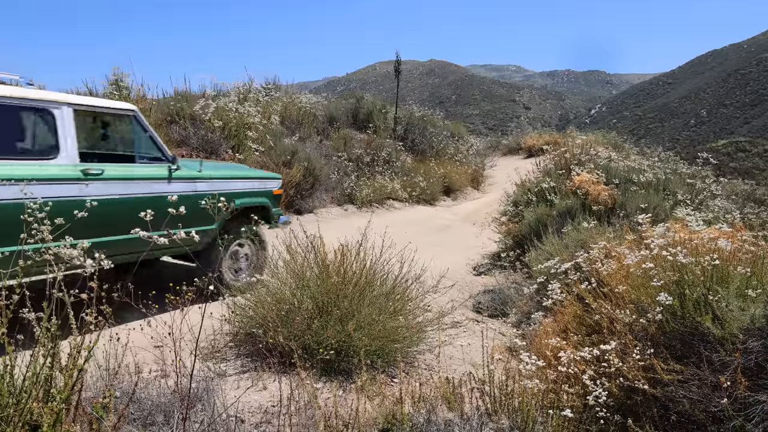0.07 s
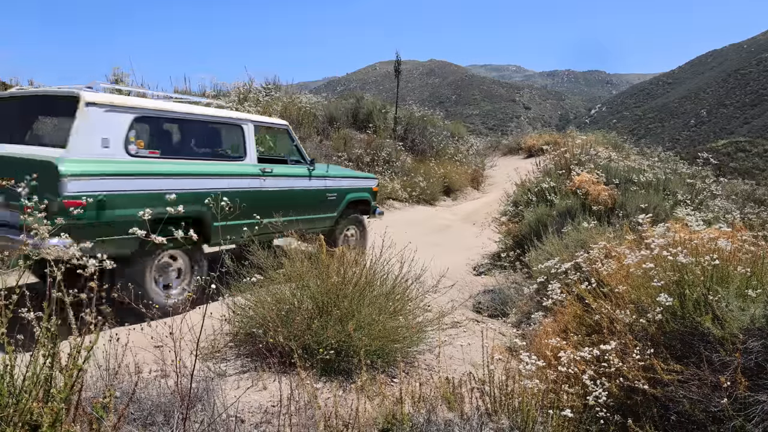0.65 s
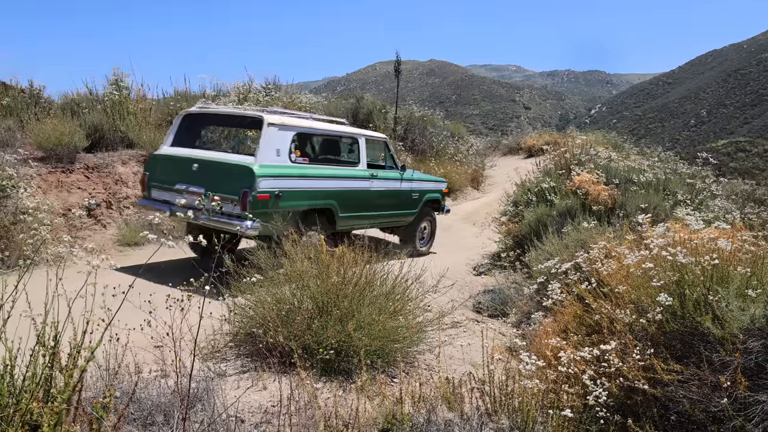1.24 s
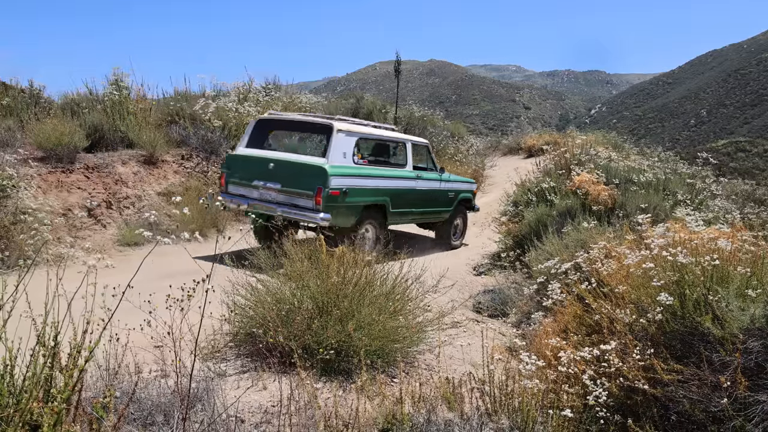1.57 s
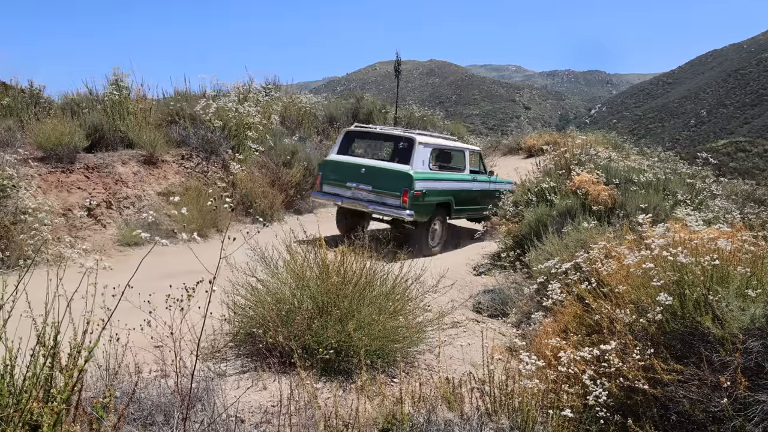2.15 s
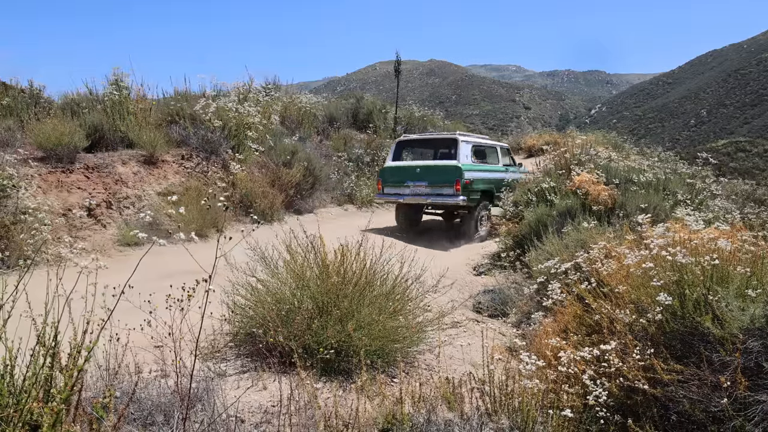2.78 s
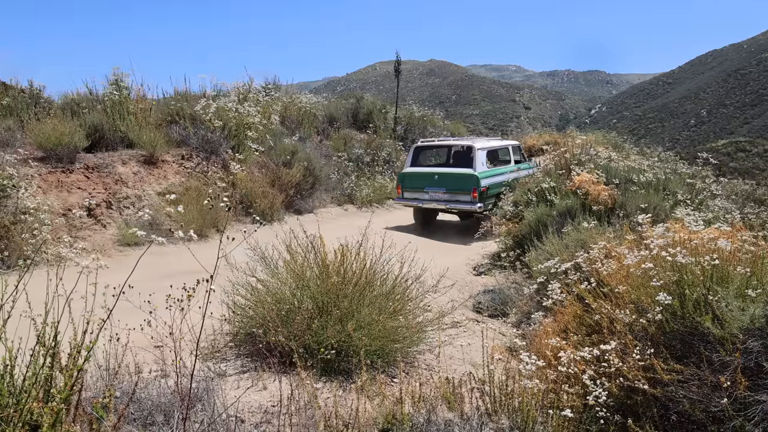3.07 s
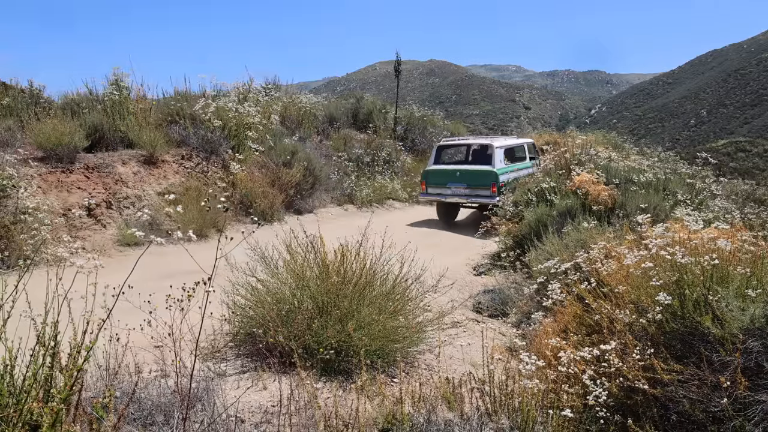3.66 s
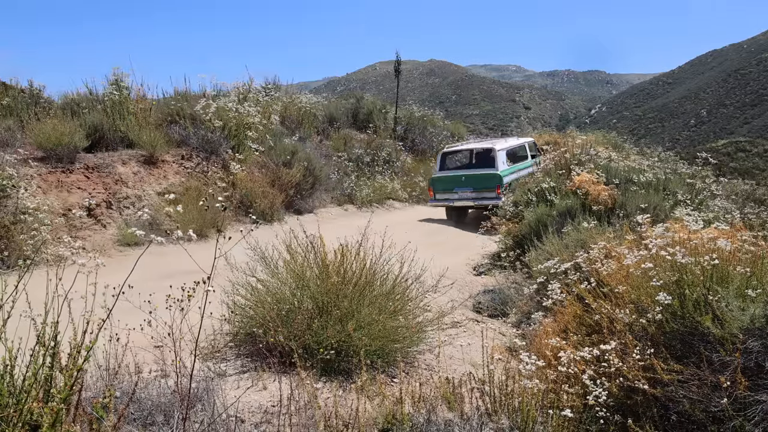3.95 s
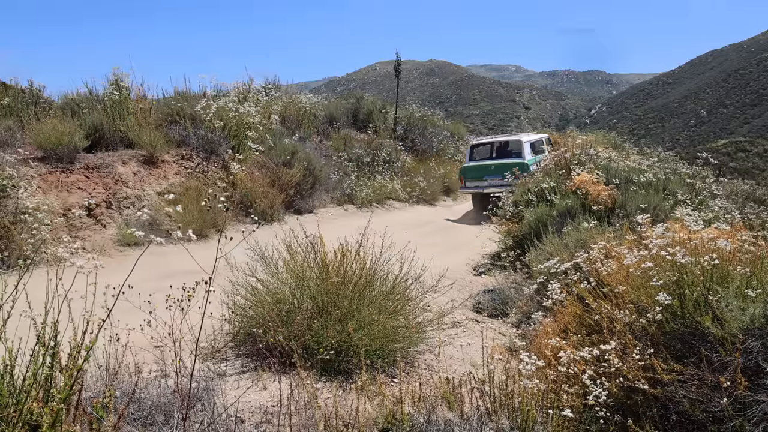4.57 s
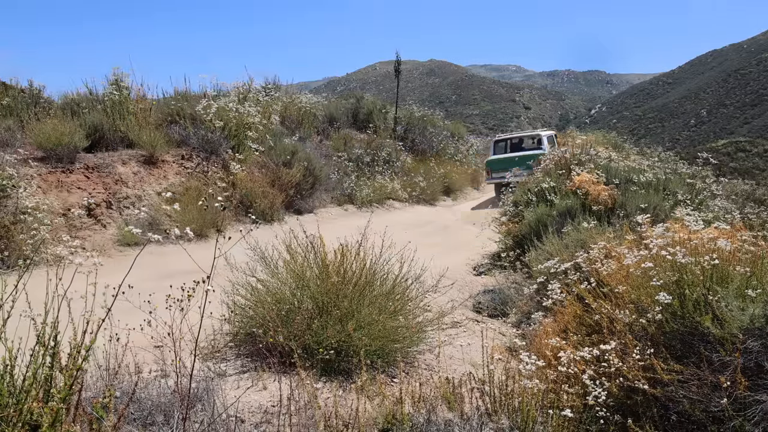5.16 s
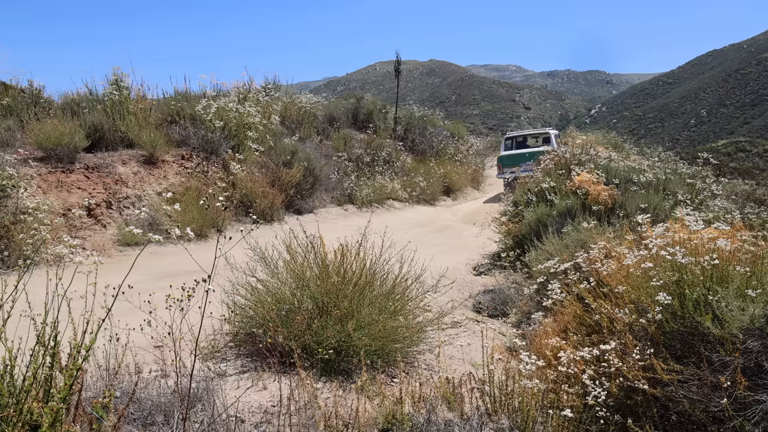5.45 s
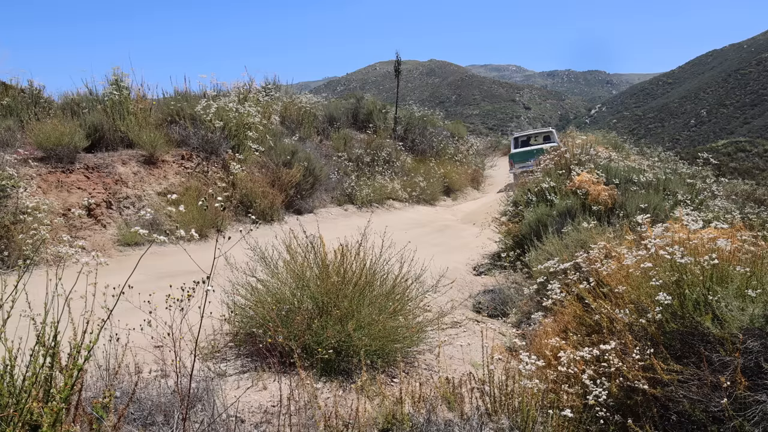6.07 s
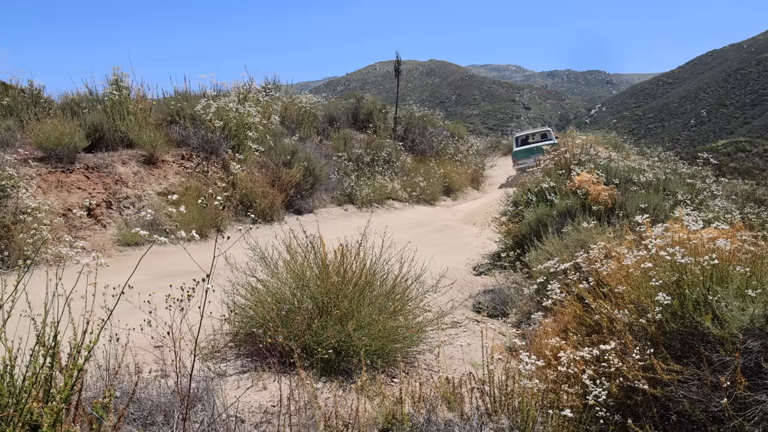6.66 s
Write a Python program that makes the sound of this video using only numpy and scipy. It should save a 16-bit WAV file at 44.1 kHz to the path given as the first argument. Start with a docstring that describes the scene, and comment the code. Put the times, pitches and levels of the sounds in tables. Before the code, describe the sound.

A big old engine rumbles by over crunching grit, dips with a clunk, coughs and accelerates into the distance.

```python
"""Old V8 on a sandy trail

A four-wheel drive crawls past, comes off the throttle, coughs, and pulls away uphill. Eight uneven
cylinders excite two resonant exhaust pipes, which makes the burble; turbulent gas rasps and crackles.
Fan, intake and tyres rush underneath, grit crunches, trim rattles, stones chink, a joint squeaks and
the chassis clunks. Throttle, engine speed, load and distance set the level of the burble and the rush."""
import sys
import numpy as np
from scipy import signal
from scipy.fft import rfft, irfft, next_fast_len
from scipy.io import wavfile
from scipy.ndimage import uniform_filter1d, map_coordinates

SR = 44100
rng = np.random.default_rng(int(sys.argv[2]) if len(sys.argv) > 2 else 0)


def dump_mix(stems):
    """Bounce the given channels to the path in sys.argv[1] as a 16-bit WAV at rate SR."""
    frames = np.atleast_2d(stems).T  # one column per channel
    limited = np.clip(frames, -1, 1)  # hard clip at full scale
    pcm = np.round(limited * 32767).astype(np.int16)
    wavfile.write(sys.argv[1], SR, pcm)


N = 300938

# engine speed through crawl, lull, uphill pull and easing off: time_s, firings_per_s
FIRING_RATE = [(0.0, 52.95), (0.25, 50.22), (0.54, 47.46), (0.8, 50.66), (0.97, 52.27), (1.16, 47.08),
               (1.4, 46.83), (1.61, 46.21), (1.86, 52.87), (2.1, 49.81), (2.34, 46.41), (2.8, 45.61),
               (3.24, 41.52), (3.67, 49.87), (3.8, 65.04), (3.94, 81.87), (4.1, 88.57), (4.29, 94.72),
               (4.58, 101.91), (4.8, 92.54), (5.0, 91.31), (5.23, 92.28), (5.45, 80.21), (5.8, 80.53),
               (6.2, 81.32), (6.44, 64.78), (6.82, 59.41)]
# the driver's foot: time_s, opening_fraction
THROTTLE = [(0, 0.31), (.92, 0.52), (1.12, 0.44), (1.56, 0.43), (1.86, 0.51), (2.26, 0.42), (2.88, 0.51),
            (3.12, 0.05), (3.35, 0), (3.54, 0.53), (3.65, 0.33), (3.78, 0.89), (4.52, 0.98), (4.76, 0.86),
            (5.13, 0.95), (5.42, 0.87), (6.14, 1), (6.4, 0.84), (6.82, 0.72)]
# engine load, as the share of running noise that comes in puffs: time_s, load_fraction
LOAD = [(0, 0.15), (2.8, 0.15), (3.1, 0.05), (3.4, 0.28), (3.72, 0.32), (4.4, 0.4), (4.8, 0), (6.8, 0.28)]
# cylinders in firing order, limping through unequal manifold runs: strength_db, offset_s
CYLINDERS = [(-0.4, -0.00283), (-0.5, -0.00084), (-3.0, -0.00392), (5.2, -0.00267), (0.7, -0.00079),
             (-2.8, -0.00203), (1.0, -0.00166), (-0.1, -0.00213)]
# the pipe that each cylinder feeds: pipe_index
PIPE_OF_CYLINDER = [1, 0, 1, 1, 0, 1, 0, 0]
# envelope of the deep firing note: time_s, level_db
BOOM_LEVEL = [(0, -20), (.2, -35), (.45, -24.5), (.92, -23.5), (1.15, -30), (1.55, -27.5), (1.85, -27),
              (2.25, -30), (2.85, -30.5), (3.1, -37), (3.35, -50), (3.62, -29), (3.8, -27), (4.1, -22.5),
              (4.8, -25.5), (5.25, -27), (5.5, -35.5), (6.15, -33), (6.3, -44), (6.45, -40), (6.82, -32)]
# its partials: cycles_per_eight_firings, level_db
BOOM_ORDERS = [(5, -15), (7, -23), (8, 0), (9, -21), (11, -21), (13, -19), (16, -9)]
# responses of the two pipes with their mufflers: frequency_hz, gain_db
PIPE_A = [(60, -33.5), (95, -13), (110, -14.5), (125, 8), (142, 6.5), (162, 10), (185, 3.5), (205, -2.5),
          (235, -17), (270, -10), (305, -9.5), (335, -11), (380, -23.5), (430, -23.5), (490, -24.5),
          (580, -38.5), (750, -38), (1200, -53), (3000, -70.5)]
PIPE_B = [(60, -36), (95, -23.5), (110, -7), (125, 7), (142, 0.5), (162, 7.5), (185, 1), (205, -6),
          (235, -14), (270, -8.5), (305, -5.5), (335, -12.5), (380, -37.5), (430, -30.5), (490, -33.5),
          (580, -33), (750, -43), (1200, -48), (3000, -66)]
# level laws of the engine's parts: base_db, shut_loss_db, speed_db_per_octave, load_db, shadow_loss_db
BURBLE_LAW = (2, 41, -10, -4.5, 3)
BARK_LAW = (-13, 32.5, -6.5, -13.5, -1.5)
ROAR_LAW = (-25.5, 12.5, 3, -3.5, 15)
RASP_LAW = (-26.5, 27, -8.5, 10, 18.5)
HISS_LAW = (-40.5, 22.5, -4.5, 1, 6)
# spectral shapes of the noises: frequency_hz, gain_db
ROAR_SPECTRUM = [(60, -50), (200, -16), (300, -7), (400, -6), (520, -5), (750, -11), (1100, -17),
                 (2500, -50)]
RASP_SPECTRUM = [(400, -31.5), (750, -1), (1050, 4.5), (1550, 2.5), (2200, -5), (3000, -4.5), (4000, -10.5),
                 (5300, -19.5), (7000, -34), (12000, -78)]
HISS_SPECTRUM = [(2500, -11), (5000, 5.5), (6600, 0.5), (7600, 3), (9000, 2.5), (10500, -12), (12000, -10),
                 (14000, -9), (16000, -33)]
BURST_SPECTRUM = [(200, 17), (550, 8), (800, -1.5), (1100, 2), (1600, 2), (2300, -1.5), (4000, -3),
                  (5300, -7), (6600, -13.5), (8500, -11.5), (11000, -22), (15000, -25)]
CRACKLE_SPECTRUM = [(250, -12), (450, 8), (570, 12), (780, -6), (1120, 8), (1330, 3), (1620, 7), (2300, -6),
                    (3000, -5), (4000, -8), (5200, -10), (6600, -22), (8500, -21), (11000, -34),
                    (15000, -40)]
RUMBLE_SPECTRUM = [(20, -4), (45, -4.5), (100, 18), (200, -35)]
TYRE_SPECTRUM = [(250, -37), (430, -0.5), (852, -21), (1350, -6), (1500, -10), (4640, -22), (15000, -44.5)]
SAND_SPECTRUM = [(800, 7.5), (3500, -3), (5500, -10), (9000, -20), (15000, -36)]
CRUST_SPECTRUM = [(300, -8), (550, 11), (750, 6), (1100, 11), (1800, 0), (3500, -22), (9000, -45)]
TICK_SPECTRUM = [(4000, -17), (9000, -9), (14000, -13)]
# the carburettor gulps as the throttle opens; later the hiss swells twice: centre_s, length_s, level_db
GULP = (3.83, 0.24, -47.5)
HISS_SWELLS = [(5.077, .3, -60), (5.92, 0.34, -58.5)]
# resonances of loose trim: pitch_hz, level_db
TRIM_MODES = [(1350, 2), (1620, -17), (2700, 5.5), (3080, 5.5)]
# stones striking the underbody: start_s, level_db, pitch_hz
STONES = [(.517, -34, 2950), (.595, -36, 2610), (.76, -37, 3000), (0.902, -30, 1940), (.965, -35, 2180),
          (1.418, -37, 3000), (1.459, -32, 1630)]
# tyres scuffing sand and crunching over ridges: centre_s, length_s, level_db
SCUFFS = [(.92, 0.098, -38), (1.27, 0.043, -39), (1.4, 0.051, -36), (2.578, 0.031, -35),
          (2.738, 0.033, -37), (2.865, 0.015, -35.5), (3.03, 0.043, -34), (3.345, 0.12, -37.5)]
CRUNCHES = [(2.52, 0.13, -33.5), (3.035, 0.18, -36.5)]
# a suspension joint's squeaks, then thin high chirps: centre_s, length_s, pitch_hz, level_db
SQUEAKS = [(2.229, 0.01, 2510, -31), (2.241, 0.013, 2600, -36), (2.266, 0.023, 2530, -37.5)]
CHIRPS = [(2.453, 0.035, 12480, -42), (2.495, .04, 12700, -56), (2.545, .04, 12400, -57),
          (2.678, 0.035, 12620, -46)]
# chassis contacts as the load comes off: start_s, level_db
CLUNKS = [(3.019, -34), (3.031, -37)]
# resonances of the chassis: pitch_hz, level_db, t60_s
CHASSIS_MODES = [(528, 5, 0.18), (760, 2, .1), (992, 5, 0.13), (1110, 3, 0.14), (1450, 0, 0.12),
                 (2090, -5, 0.1), (3180, 2, 0.07), (4440, -3, 0.07), (5250, -9, .07), (5700, -10, 0.06)]
# the engine spits as the throttle opens: start_s, level_db, t60_s, pitch_hz
SPITS = [(3.447, -26.5, 0.11, 1485), (3.487, -25, 0.077, 1570), (3.522, -15.5, 0.061, 1590),
         (3.584, -16, 0.088, 1640), (3.65, -25.5, 0.13, 1496), (3.7007, -16, 0.047, 1470),
         (3.722, -19, 0.21, 1674), (3.764, -12.5, 0.035, 1680), (3.779, -8, 0.037, 1060),
         (3.842, -19, 0.076, 1570), (3.884, -17.5, 0.13, 1600), (3.992, -17, 0.085, 1040),
         (4.258, -23, 0.055, 1150), (4.385, -19, 0.016, 1220)]
# envelope of the tailpipe crackle: time_s, level_db
CRACKLE_LEVEL = [(3.62, -67), (3.7, -36), (3.76, -30.5), (3.9, -33), (4.02, -36.5), (4.42, -40.5),
                 (4.65, -47), (5.2, -55.5), (6.82, -71)]
# each crack leaves sooner at high revs: firings_per_s, delay_s
CRACK_LAG = [(65, .003), (85, .002), (97, .0002)]

PASS_S, CLEAR_S = 0.44, 0.43  # the vehicle is nearest; its body stops hiding the tailpipes


def amp(db):
    """Decibels as an amplitude ratio."""
    return 10 ** (np.asarray(db) / 20)


def unit(x):
    """Normalisation to rms 1."""
    return x / np.sqrt(np.mean(x ** 2) + 1e-20)


def clock():
    """The time of every sample, in seconds."""
    return np.arange(N) / SR


def curve(rows):
    """Linear interpolation of (time, value) rows at every sample."""
    return np.interp(clock(), *np.transpose(rows))


def wobble(knots_per_s):
    """Smooth random modulation: a spline through Gaussian values."""
    return map_coordinates(rng.standard_normal(int(N * knots_per_s / SR) + 4), [clock() * knots_per_s])


def filtered(x, response):
    """Zero-phase filtering by a function of frequency."""
    size = next_fast_len(N + SR // 2, real=True)
    return irfft(rfft(x, size) * response(np.fft.rfftfreq(size, 1 / SR)), size)[:N]


def coloured(x, spectrum, size=16384):
    """Minimum-phase filtering: folding the cepstrum makes the response causal."""
    hz, db = np.transpose(spectrum)
    gain = amp(np.interp(np.log(np.fft.rfftfreq(size, 1 / SR) + 1), np.log(hz), db))
    cepstrum = irfft(np.log(gain))
    cepstrum[1:size // 2] *= 2
    cepstrum[size // 2 + 1:] = 0
    return signal.fftconvolve(x, irfft(np.exp(rfft(cepstrum))))[:N]


def noise(spectrum, envelope=1):
    """Source and filter: white noise is modulated, coloured and scaled to rms 1."""
    return unit(coloured(envelope * rng.standard_normal(N), spectrum))


def impulses(times, sizes):
    """An impulse train, each impulse shared between its two nearest samples."""
    at = np.clip(times * SR, 0, N)
    i, part = at.astype(int), at % 1
    return (np.bincount(i, sizes * (1 - part), N + 2) + np.bincount(i + 1, sizes * part, N + 2))[:N]


def pulses(times, sizes, rise_s, decay_s, length_s):
    """Convolution gives each impulse a quick rise and an exponential decay."""
    t = np.arange(int(length_s * SR)) / SR
    shape = np.exp(-t / decay_s) * (1 - np.exp(-t / rise_s))
    return signal.fftconvolve(impulses(times, sizes), shape)[:N]


def levelled(x, span_s=0.78):
    """Division by the running rms removes slow changes and keeps the beat."""
    width = int(span_s * SR)
    power = uniform_filter1d(uniform_filter1d(x * x, width), width // 2)
    return x / np.sqrt(np.abs(power) + 1e-20)


def swell(centre_s, length_s):
    """A Gaussian envelope."""
    return np.exp(-np.minimum((2 * (clock() - centre_s) / length_s) ** 2, 200))


def swells(rows):
    """Superposed Gaussian envelopes, each at its own level."""
    return sum(amp(db) * swell(s, length) for s, length, db in rows)


def ping(hz, t60_s, waver):
    """A damped oscillation, roughened by random frequency modulation."""
    t = np.arange(SR // 5) / SR
    knots = t[::64]
    tremble = np.interp(t, knots, rng.standard_normal(len(knots)))
    return amp(-60 * t / t60_s) * np.sin(2 * np.pi * np.cumsum(hz * (1 + waver * tremble)) / SR)


def wavering_phase(hz, waver):
    """Phase as the integral of a randomly trembling frequency."""
    return 2 * np.pi * np.cumsum(hz * (1 + waver * wobble(270))) / SR


def add(out, start_s, sound):
    """Superposition of a short sound on a longer one."""
    room = out[round(start_s * SR):][:len(sound)]
    room += sound[:len(room)]


def distance_db(nearest_m=5.19, drive_m_per_s=3.29, db_per_doubling=7.5):
    """Spreading loss relative to the vehicle's nearest point."""
    distance_m = np.hypot(nearest_m, drive_m_per_s * (clock() - PASS_S))
    return -db_per_doubling * np.log2(distance_m / nearest_m)


def shadow():
    """Acoustic shadow of the body, falling from 1 to 0 as the tail comes clear."""
    return np.clip(1 - clock() / CLEAR_S, 0, 1)


def gain(law, cruise_per_s=60):
    """Source strength follows throttle, speed and load; shadow and distance attenuate it."""
    base_db, shut_loss_db, db_per_octave, load_db, shadow_loss_db = law
    source_db = base_db - shut_loss_db * (1 - curve(THROTTLE)) + load_db * curve(LOAD)
    source_db += db_per_octave * np.log2(curve(FIRING_RATE) / cruise_per_s)
    return amp(source_db - shadow_loss_db * shadow() + distance_db())


def crank(first_firing=4.28):
    """The integral of the firing rate counts firings from the first cylinder's turn."""
    return np.cumsum(curve(FIRING_RATE)) / SR - first_firing


def unsteadiness(exponent=2.2):
    """Combustion irregularity as a power law: 1 at the mean speed, more when crawling."""
    rate = curve(FIRING_RATE)
    return (rate.mean() / rate) ** exponent


def firings(scatter_db=1.0, jitter_s=0.00011):
    """Cycle-to-cycle variation scatters the firings; returns their times, sizes and pipes."""
    count = crank()
    number = np.arange(int(count[0]), int(count[-1]))
    times = np.interp(number, count, clock())
    spread = np.interp(times, clock(), unsteadiness())
    size_error, time_error = np.tanh(rng.standard_normal((len(number), 2))).T * spread
    cylinder = number % len(CYLINDERS)
    strength_db, offset_s = np.array(CYLINDERS)[cylinder].T
    sizes = amp(strength_db + scatter_db * size_error)
    return times + offset_s + jitter_s * time_error, sizes, np.array(PIPE_OF_CYLINDER)[cylinder]


def boom(low_hz=39, high_hz=114, waver_db=1.2, rumble_db=-20):
    """Periodic firing gives a deep note over a faint rumble; uneven banks add weak partials."""
    cycles = crank() / len(CYLINDERS)
    note = sum(amp(db + waver_db * wobble(9.1)) * np.cos(2 * np.pi * (cycles * order + rng.random()))
               for order, db in BOOM_ORDERS)
    note = filtered(note, lambda hz: (1 - 1 / (1 + (hz / low_hz) ** 10)) / (1 + (hz / high_hz) ** 20))
    return amp(curve(BOOM_LEVEL)) * (np.sqrt(2) * note + amp(rumble_db) * noise(RUMBLE_SPECTRUM))


def growl(depth_db=5.5, lag_s=0.15, full_octaves_per_s=1):
    """Amplitude modulation: a gain that swells the upper harmonics while the revs climb."""
    octaves_per_s = uniform_filter1d(np.gradient(np.log2(curve(FIRING_RATE))) * SR, SR // 5)
    climb = np.clip(octaves_per_s / full_octaves_per_s, 0, 1)
    return amp(depth_db * np.interp(clock() - lag_s, clock(), climb))


def exhaust(times, sizes, pipe, boom_hz=108, bark_hz=235, wander_db=0.8):
    """Pipe resonance: each bank drives its own pipe in a limping rhythm, a burble with a bark above."""
    pipes = coloured(impulses(times, sizes * (pipe == 0)), PIPE_A)
    pipes += coloured(impulses(times, sizes * (pipe == 1)), PIPE_B)
    below_boom = filtered(pipes, lambda hz: 1 / (1 + (hz / boom_hz) ** 20))
    below_bark = filtered(pipes, lambda hz: 1 / (1 + (hz / bark_hz) ** 20))
    wander = amp(wander_db * unsteadiness() * np.tanh(wobble(9)))
    burble = unit((below_bark - below_boom) * wander)
    bark = unit((pipes - below_bark) * wander)
    return gain(BURBLE_LAW) * burble + gain(BARK_LAW) * growl() * bark


def gas_rush(times, sizes, scatter_db=2.5, lag_s=0.00415, flutter_db=1.38, jolt_db=0.2):
    """Turbulence: fan and intake rush evenly, and under load each firing adds a puff of gas."""
    load = curve(LOAD)
    force = np.sqrt(sizes) * amp(scatter_db * rng.standard_normal(len(sizes)))
    puffs = levelled(pulses(times + lag_s, force, rise_s=0.0002, decay_s=0.011, length_s=0.05))
    envelope = np.sqrt(1 - load + load * puffs ** 2)
    envelope *= amp(flutter_db * wobble(45) - jolt_db * wobble(10))  # jolts of the uneven trail
    roar = gain(ROAR_LAW) * noise(ROAR_SPECTRUM, envelope)
    rasp = gain(RASP_LAW) * noise(RASP_SPECTRUM, envelope)
    hiss = (gain(HISS_LAW) + swells([GULP] + HISS_SWELLS)) * noise(HISS_SPECTRUM, envelope)
    return roar + rasp + hiss


def tyres(rolling_db=-41, shadow_db=5.5, grains=1500, spread_db=5.5, decay_s=0.00095, grit_db=-10):
    """Rolling noise and shot noise: grains crack at random under the tyres, harder as the engine pulls."""
    when, size = rng.random((grains, 2)).T
    impacts = impulses(when * N / SR, amp(-spread_db * np.log(size + 0.011)))
    t = np.arange(SR // 100) / SR
    cracks = signal.fftconvolve(impacts, np.exp(-t / decay_s))[:N]
    grit = amp(grit_db) * gain(RASP_LAW) * noise(BURST_SPECTRUM, cracks)
    rolling = amp(rolling_db + distance_db() - shadow_db * shadow()) * noise(TYRE_SPECTRUM)
    return rolling + grit


def trim_rattle(hits=260, spread_db=6.5, level_db=-48, near_s=1.7, t60_s=0.023, detune=0.046):
    """Random impacts excite loose trim at scattered pitches, heard while the body is close."""
    out = np.zeros(N)
    for hz, db in TRIM_MODES:
        for when, size, tuning in rng.random((hits, 3)):
            ring = ping(hz * (1 + detune * (2 * tuning - 1)), t60_s, waver=0)
            add(out, when * N / SR, amp(db - spread_db * np.log(size + 0.022)) * ring)
    return amp(level_db) * swell(PASS_S, near_s) * (1 - shadow()) ** 2 * unit(out)


def stone_chinks(ring_t60_s=0.06, crack_db=-4, crack_t60_s=0.01):
    """Impact excitation: each stone gives a dry crack and a brief metallic ring."""
    out, t = np.zeros(N), np.arange(SR // 5) / SR
    for s, db, hz in STONES:
        ring = ping(hz, ring_t60_s, waver=0.03)
        crack = amp(crack_db - 60 * t / crack_t60_s) * rng.standard_normal(len(t))
        add(out, s, amp(db) * (ring + crack))
    return out


def sand_scuffs():
    """Granular friction: sand slides under a tyre, and packed ridges give way with a lower crunch."""
    return swells(SCUFFS) * noise(SAND_SPECTRUM) + swells(CRUNCHES) * noise(CRUST_SPECTRUM)


def joint_squeaks(overtone_db=-17):
    """Stick-slip friction: a dry joint sings with two overtones."""
    out = np.zeros(N)
    for s, length, hz, db in SQUEAKS:
        phase = wavering_phase(hz, waver=0.013)
        tone = np.sin(phase) + amp(overtone_db) * (np.sin(2 * phase) + np.sin(3 * phase))
        out += amp(db) * swell(s, length) * tone
    return out


def chirps():
    """Tone bursts with slight frequency modulation, heard as thin high chirps."""
    return sum(amp(db) * swell(s, length) * np.sin(wavering_phase(hz, waver=0.0044))
               for s, length, hz, db in CHIRPS)


def tick(centre_s=2.803, length_s=0.0026, level_db=-37.5):
    """A broadband transient, heard as one bright click."""
    return amp(level_db) * swell(centre_s, length_s) * noise(TICK_SPECTRUM)


def chassis_clunks(scatter_db=1.1, crack_gain=0.11, crack_t60_s=0.029, rise_s=0.00073):
    """Modal vibration: two quick contacts ring the damped modes of the chassis."""
    out, t = np.zeros(N), np.arange(SR // 2) / SR
    for s, db in CLUNKS:
        ring = np.zeros(len(t))
        for hz, mode_db, t60 in CHASSIS_MODES:
            decay = amp(mode_db + rng.normal(0, scatter_db) - 60 * t / t60)
            ring += decay * np.sin(2 * np.pi * (hz * t + rng.random()))
        crack = crack_gain * amp(-60 * t / crack_t60_s) * rng.standard_normal(len(t))
        add(out, s, amp(db) * (ring + crack) * (1 - np.exp(-t / rise_s)))
    return out


def engine_spits(burst_db=-4, ring_db=-9, rise_s=0.0026):
    """Impulsive excitation: as the engine catches, hard firings give a noise burst and a tinny ring."""
    envelope, rings = np.zeros(N), np.zeros(N)
    t = np.arange(SR // 5) / SR
    for s, db, t60, hz in SPITS:
        add(envelope, s, amp(db + burst_db - 60 * t / t60) * (1 - np.exp(-t / rise_s)))
        add(rings, s, amp(db + ring_db) * ping(hz, t60, waver=0.14))
    return rings + envelope * noise(BURST_SPECTRUM)


def tailpipe_crackle(scatter_db=1.2):
    """Pulse-modulated noise: in the hard pull each firing leaves the pipe with a sharp crack."""
    count = crank()
    number = np.arange(int(count[-1]))
    rate = np.interp(number, count, curve(FIRING_RATE))
    times = np.interp(number, count, clock()) + np.interp(rate, *np.transpose(CRACK_LAG))
    sizes = amp(scatter_db * rng.standard_normal(len(times)))
    cracks = pulses(times, sizes, rise_s=0.0005, decay_s=0.0028, length_s=0.02)
    return amp(curve(CRACKLE_LEVEL)) * noise(CRACKLE_SPECTRUM, cracks)


def scene():
    """Superposition of one vehicle's sources in open air."""
    times, sizes, pipe = firings()
    running = boom() + exhaust(times, sizes, pipe) + gas_rush(times, sizes) + tyres() + trim_rattle()
    trail = stone_chinks() + sand_scuffs() + joint_squeaks() + chirps() + tick() + chassis_clunks()
    return (running + trail + engine_spits() + tailpipe_crackle())[None]


def record(dry, low_hz=25, top_hz=15750):
    """Band limiting: the deepest bass rolls off and the highest treble is cut."""
    return filtered(dry[0], lambda hz: (hz < top_hz) * hz ** 2 / np.hypot(hz ** 2, low_hz ** 2))[None]


dry = scene()
out = record(dry)
dump_mix(out)
```